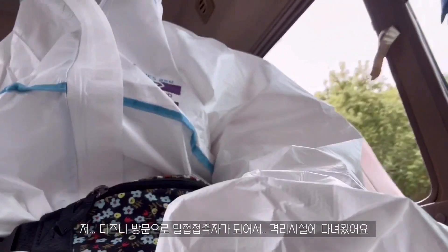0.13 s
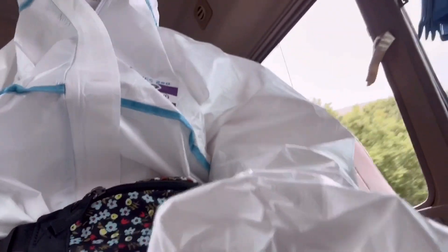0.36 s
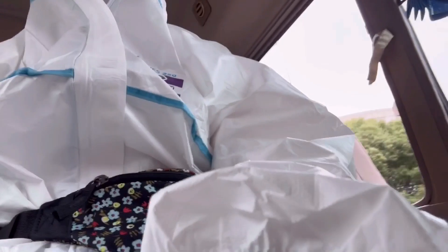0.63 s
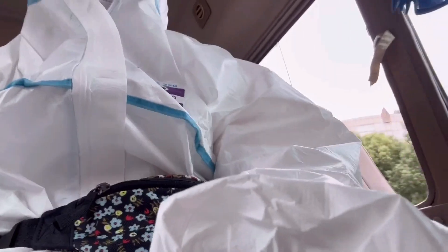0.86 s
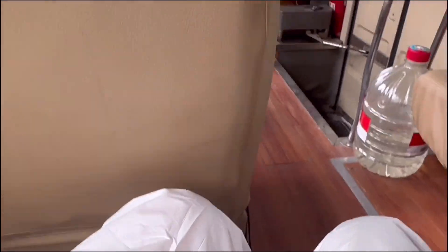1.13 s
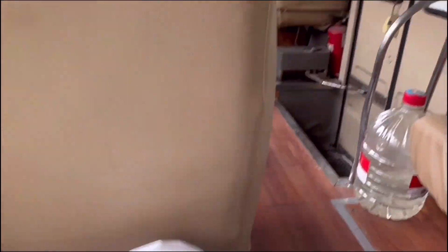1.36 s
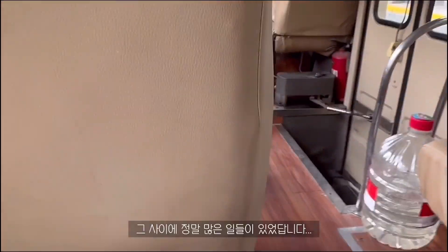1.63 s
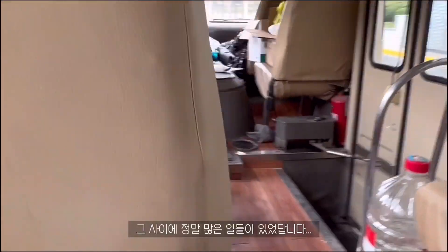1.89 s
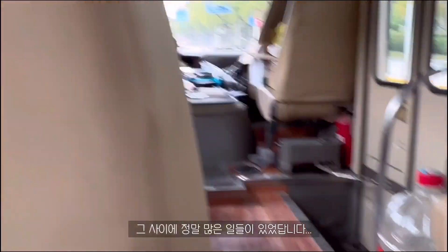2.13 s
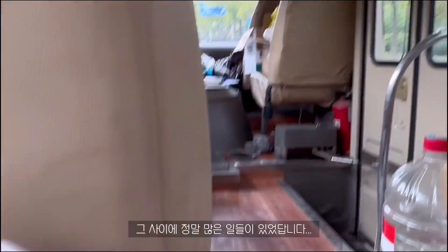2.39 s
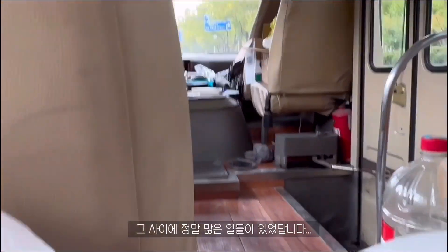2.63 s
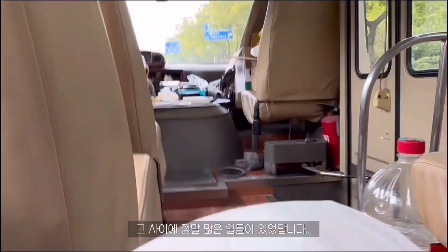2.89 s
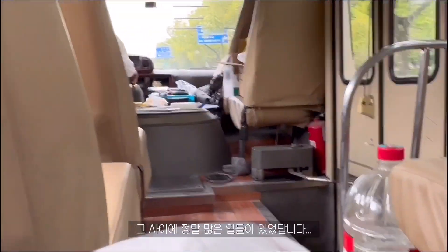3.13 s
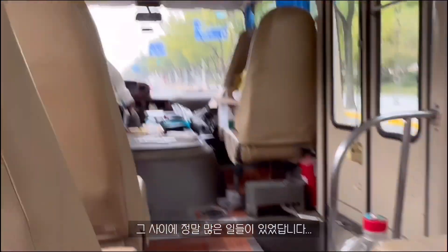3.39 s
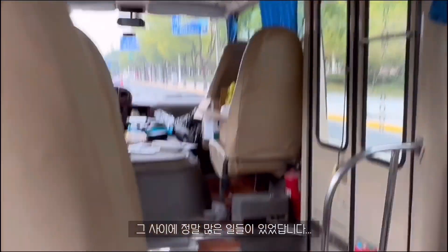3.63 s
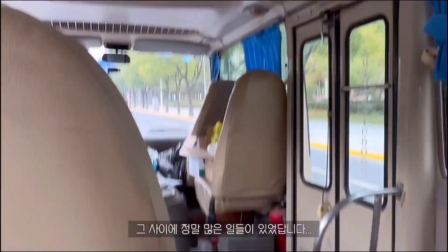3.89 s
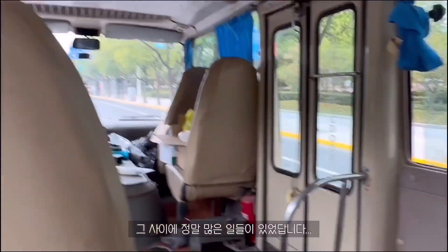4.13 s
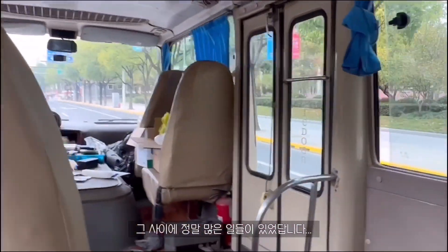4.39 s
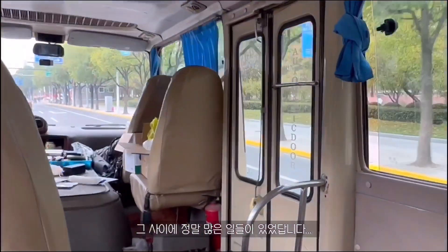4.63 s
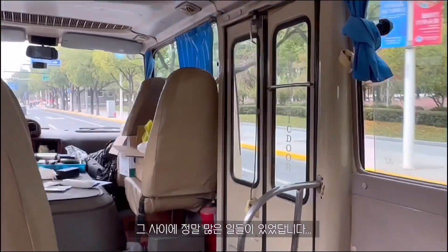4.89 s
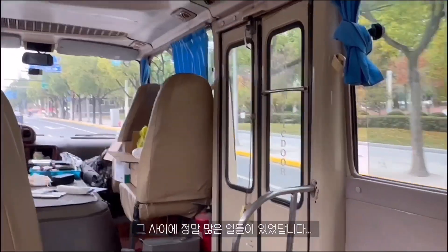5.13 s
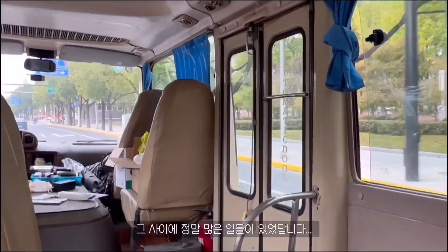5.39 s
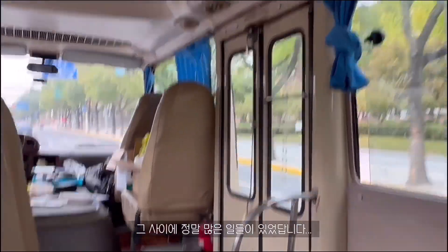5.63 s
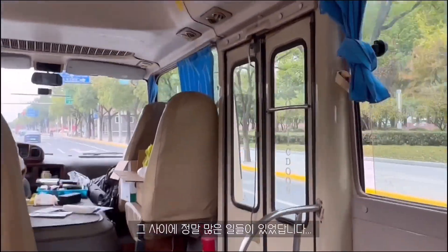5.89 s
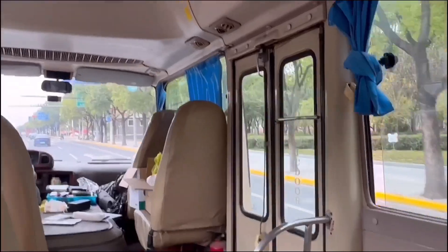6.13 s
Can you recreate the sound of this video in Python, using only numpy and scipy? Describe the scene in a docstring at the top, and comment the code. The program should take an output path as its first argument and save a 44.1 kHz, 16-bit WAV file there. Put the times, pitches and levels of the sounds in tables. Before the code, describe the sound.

Inside a moving minibus, a low engine drone and rumbling tyre roar carry on, with faint metallic ticks, small squeaks and two sharper trim rattles.

```python
"""Minibus on the road

Inside the cabin, in stereo, as a hand-held phone hears it at two microphone ports; the listening position jumps once.
The engine is an unsteady sine at its firing rate; floor rumble, tyre roar and air hiss are shaped noise.
A latch rings in metal modes, a door seal and a seat squeak in sine partials, trim rustles and creaks in noise bursts.
In gusts the phone's wind processing turns the middle tones to opposite phase; pops are short falling chirps."""
import sys
import numpy as np
from scipy import signal
from scipy.fft import rfft, irfft
from scipy.io import wavfile
from scipy.ndimage import uniform_filter1d

SR = 44100
rng = np.random.default_rng(int(sys.argv[2]) if len(sys.argv) > 2 else 0)


def makeup_ratio(level_db):
    """Linear amplitude ratio for a level in decibels (20 dB per factor of ten)."""
    decades = np.asarray(level_db, float) / 20
    return 10 ** decades


def store_pcm(level_fs):
    """Save levels as 16-bit WAV."""
    pcm = np.round(np.clip(level_fs, -1, 1) * 32767).astype(np.int16)
    wavfile.write(sys.argv[1], SR, np.atleast_2d(pcm).T)


N = 275933

CUT_S = 0.9445  # the listening position jumps here
# how far the phone has turned from facing ahead to facing the door [time_s, share 0-1]
FACING_DOOR = [(4.05, 0), (4.2, 0.75), (5.6, 1), (6.1, 0.5)]


def evened(x):
    """Scales to rms 1."""
    return x / np.sqrt(np.mean(x ** 2) + 1e-20)


def curve(rows, t, column=1):
    """Reads one column of a table at times t, in straight lines between its rows."""
    rows = np.asarray(rows)
    return np.interp(t, rows[:, 0], rows[:, column])


def over_hz(rows, hz):
    """Reads all columns of a table on a log-frequency axis."""
    row_hz, *columns = np.transpose(rows)
    return [np.interp(np.log(hz + 1), np.log(row_hz), c)[:, None] for c in columns]


def add(mix, start_s, sound):
    """Mixes a sound in at start_s."""
    part = mix[round(start_s * SR):][:len(sound)]
    part += sound[:len(part)]


def waver(count, size):
    """Smooth random drift of rms 1."""
    noise = rng.standard_normal(count)
    return evened(uniform_filter1d(uniform_filter1d(noise, size), size))


def humps(rows, t):
    """Sum of bell-shaped rises or dips in dB."""
    return sum(db * np.exp(-((t - s) / half_s) ** 2) for s, db, half_s in rows)


def resonate(x, hz, width_hz):
    """A fixed or moving resonance of gain 1, with two equal poles for steep skirts."""
    r = np.exp(-np.pi * width_hz / SR)
    turn = np.exp(2j * np.pi * np.cumsum(hz * np.ones(len(x))) / SR)
    # shift the resonance down to 0 Hz, low-pass there, shift back
    return 2 * (turn * signal.lfilter([(1 - r) ** 2], [1, -2 * r, r * r], x / turn)).real


def squeal(hz, orders, length_s, rough, flutter_db):
    """Stick-slip: partials that follow one unsteady pitch, each fluttering in level."""
    count = round(length_s * SR)
    turn = 2 * np.pi * np.cumsum(hz * (1 + rough * waver(count, size=40))) / SR
    return sum(makeup_ratio(db + flutter_db * waver(count, size=90)) * np.sin(k * turn) for k, db in orders)


def wind_processing(t):
    """Strength and octave shift of the phone's wind processing in the strongest gust at each time."""
    # gusts; the octaves move the flipped tones up, or down if negative
    # [start_s, length_s, strength 0-1, shift_octaves]
    gusts = [(1.698, .04, 0.96, 0.23), (1.714, 0.085, 0.97, -0.15), (1.783, 0.13, 0.83, -0.12),
             (1.9, 0.086, 0.94, -0.077), (1.948, 0.091, 0.76, -0.067), (2.01, 0.1, 0.91, -0.11),
             (2.11, 0.073, 0.8, -0.09), (2.177, .17, 0.61, -.1), (2.305, .16, 0.72, 0.085),
             (2.406, .06, 0.8, 0.09), (2.445, 0.11, 0.99, 0.41), (2.575, 0.073, 0.1, 0.01),
             (2.795, 0.33, 0.02, -0.11), (3.149, 0.077, 0.6, .05), (3.485, .19, 0.72, -0.16),
             (3.659, 0.065, 0.95, 0.098), (3.721, 0.099, 0.92, 0.019), (3.878, 0.096, 0.98, 0.0014),
             (3.942, 0.089, 0.91, -0.071), (4.016, 0.072, 1, 0.083)]
    rise_s, fall_s = 0.014, 0.014
    blows = []
    for start_s, length_s, strength, _ in gusts:
        ramp = np.minimum((t - start_s) / rise_s, (start_s + length_s - t) / fall_s)
        blows.append(strength * np.clip(ramp, 0, 1))
    octaves = np.array(gusts)[np.argmax(blows, axis=0), -1]
    return np.clip(np.max(blows, axis=0), 0, 1), octaves


def likeness(hz, t, lift=0):
    """How alike the ports hear each frequency (1 same, -1 opposite) by phone angle and wind processing."""
    # left-right likeness, clipped to +-1 once mixed
    # [pitch_hz, before the cut (ratio), ahead (ratio), door (ratio), full gust (ratio)]
    same = [(45, 0.6, 1.25, 1.4, 0.36), (84, 0.83, 1, 1.27, -0.79), (233, 0.75, 1.015, 0.33, -0.95),
            (397, 0.42, 0.91, 0.84, -1.03), (600, 0.7, 0.42, -0.24, -1.1), (865, -0.3, 0.68, 0.57, -1.094),
            (1060, -0.73, 0.39, -0.11, -0.86), (1530, -0.19, 0.9, 0.95, 0.077),
            (1930, 0.048, 0.84, 0.97, 0.15), (3220, -0.23, 0.41, 0.5, -0.084), (3900, .1, 0.5, 0.049, 0.34),
            (5020, -0.12, -0.62, -0.087, -0.64), (5800, -0.11, 0.93, 0.48, 1),
            (6100, -0.25, 1.05, 0.68, 1.02), (7300, 0.6, 1.05, 0.63, 1.02), (7580, -0.5, 0.7, 0.49, 0.6),
            (9000, -0.63, -0.096, -0.054, 0.039), (10000, -0.89, -0.27, -0.68, -0.36),
            (10950, 0.6, -1.08, -0.97, -0.71), (11600, 0.33, -1.94, -1.18, -1.7),
            (12300, .8, -1.2, -1.2, -1.2), (14000, 1, -1.2, -1.2, -1.3), (15000, .8, -1.0, -1.0, -1.0) ]
    flip_top_hz = 2500  # the octave shift fades out around here
    before, ahead, door, windy = over_hz(same, hz)
    turn = np.clip(curve(FACING_DOOR, t), 0, 1)
    gust, octaves = wind_processing(t)
    shifted_hz = hz[:, None] / 2 ** (octaves * np.exp(-(hz[:, None] / flip_top_hz) ** 2))
    windy = np.interp(shifted_hz, hz, windy[:, 0])
    calm = np.where(t < CUT_S, before, ahead + turn * (door - ahead))
    return np.clip(calm + gust * (windy - calm) + lift, -1, 1)


def road_db(law, t):
    """Level of one road layer from slow and short swells, the listening position and the gusts."""
    # slow rise and fall of the low rumble; other layers take a share [time_s, level_db]
    slow_swell = [(0, 8), (.27, 13), (.4, 10), (.55, 14), (.93, 9), (1.08, 2), (1.2, 13), (1.65, 4),
                  (2.17, 5.5), (2.36, 12.5), (2.56, 11.5), (2.7, 11), (3.1, 12.5), (3.55, 14), (3.78, 0),
                  (3.95, 9.5), (4.16, -1), (5.05, 0.5), (5.39, 7.5), (5.64, 10), (5.8, 1.5), (6.25, 0)]
    # short swells, or dips if negative, of drumming, roar and hiss; rumble moves oppositely;
    # before each layer takes its share [time_s, level_db, half_length_s]
    short_swells = [(.092, 9.5, 0.012), (.157, 2.5, 0.0098), (.27, 5.5, 0.031), (.428, -2, 0.0055),
                    (.483, 4.5, 0.011), (.65, 2, 0.026), (.806, 4, 0.0086), (1.31, 4.5, 0.12),
                    (2.2, 2, 0.036), (2.57, 1, 0.045), (2.93, 2.5, 0.26), (3.38, 6.5, 0.088),
                    (3.53, 5, 0.043), (4.02, 4, 0.074), (5.52, 2.5, 0.088), (5.74, 1.5, 0.094)]
    base_db, slow, short, first_db, door_db, gust_db = law
    gusty = uniform_filter1d(wind_processing(t)[0], size=4000)
    turned = np.maximum.accumulate(curve(FACING_DOOR, t))  # holds its highest share so far
    swell_db = base_db + slow * curve(slow_swell, t) + short * humps(short_swells, t)
    return swell_db + first_db * (t < CUT_S) + door_db * turned + gust_db * gusty


def road_layer(spectrum, level_db, patchy_db, flicker_db, size):
    """Random short-time spectra with drifting patches and a flicker shared by all bins."""
    # phase lead of the left port when fully facing the door [pitch_hz, lead_radians]
    door_lead = [(100, 0), (280, -0.92), (480, 0.37), (800, 1.33), (1700, 0.47), (3000, 0.32), (5800, 0)]
    ragged = 0.012  # brighter patches escape the flip in a gust by this much
    hop = size // 4
    frames, hz = N // hop + 5, np.fft.rfftfreq(size, 1 / SR)
    t = np.arange(frames) * hop / SR
    a, b, c, d, patches = rng.standard_normal((frames, len(hz), 5)).T
    patches = evened(uniform_filter1d(uniform_filter1d(patches, 10, 0), 8, 1))
    in_band = (hz > spectrum[0][0]) & (hz < spectrum[-1][0])
    shape = makeup_ratio(over_hz(spectrum, hz)[0]) * in_band[:, None]
    escape = ragged * wind_processing(t)[0] * np.maximum(patches, 0)
    same = np.minimum(likeness(hz, t) + escape, 1)
    # shared and opposite noise in the ratio that gives this likeness
    middle = np.sqrt(1 + same) * (a + 1j * b)
    side = np.sqrt(1 - same) * (c + 1j * d)
    lead = np.exp(1j * over_hz(door_lead, hz)[0] * curve(FACING_DOOR, t))
    stir = makeup_ratio(patchy_db * patches + flicker_db * waver(frames, size=3))
    z = np.array([(middle + side) * lead, middle - side]) * shape * stir
    noise = signal.istft(z, nperseg=size, noverlap=size - hop)[1][:, :N]
    return evened(noise) * makeup_ratio(level_db)


def road():
    """Floor rumble, panel drumming, tyre roar and air hiss: four bands of swelling noise."""
    # spectra of the layers, each scaled later to its level [pitch_hz, relative level_db]
    rumble = [(10, -24.5), (22, -10), (30, -9), (45, 3.5), (62, 4), (90, -1), (125, -7), (170, -28)]
    body = [(70, -13.5), (105, 2), (200, -4), (300, -6), (355, -9), (450, -11), (620, -19.5)]
    roar = [(330, 2), (500, -1.5), (900, 0), (1300, -6.5), (2000, -14.5), (3000, -34)]
    hiss = [(1700, 1), (2500, 2), (4000, -2), (5000, -2.5), (6500, -6), (9000, -9), (12000, -15.5),
            (16000, -23)]
    # level laws [base level_db, share of the slow swell (ratio), share of the short swells (ratio),
    # before_cut_db, facing_door_db, full_gust_db]; the last three add to the level
    rumble_law = (-43, 1, -0.65, -1.5, -0.5, -0.2)
    body_law = (-43, 0.3421, 0.8, -3.5, -1.2, 2.5)
    roar_law = (-48, -0.1268, 0.96, -3, 4, 2.5)
    hiss_law = (-58.5, 0.12, 0.87, -4, 4.5, 0.5)
    t = np.arange(N) / SR
    first_pan_db = -2.5  # left minus right before the cut, for all but the hiss
    lean = makeup_ratio(np.outer([0.5, -0.5], first_pan_db * (t < CUT_S)))
    low = road_layer(rumble, road_db(rumble_law, t), 0.83, 0.86, size=4096)
    low += road_layer(body, road_db(body_law, t), 1.92, 0.83, size=1024)
    low += road_layer(roar, road_db(roar_law, t), 0.52, 0.88, size=1024)
    return lean * low + road_layer(hiss, road_db(hiss_law, t), 1.76, 0.27, size=512)


def creak():
    """Faint grains of loose fittings: random hits, about 60 a second, each the same short noise burst."""
    hits = (rng.random(N) < 60 / SR) * makeup_ratio(3.9 * np.minimum(rng.exponential(1, N), 3))
    t = np.arange(1500) / SR
    grain = resonate(rng.standard_normal(len(t)), 3000, 2500) * makeup_ratio(-60 * t / 0.052)
    return makeup_ratio(-59.0) * signal.oaconvolve(hits, grain)[:N]


def trim():
    """Loose trim: bright rustles of dying noise, and one hollow knock of resonant noise."""
    # rustles and ticks [start_s, level_db, t60_s, centre_hz, width_octaves]
    rustles = [(0.081, -56, 0.051, 2500, 0.99), (.118, -41.5, 0.043, 7000, 0.2),
               (0.224, -39.5, 0.12, 3020, 0.38), (0.248, -33, 0.078, 6600, 1.1),
               (0.264, -38, 0.024, 2060, 0.89), (.664, -46, 0.025, 7500, 0.52),
               (1.209, -36.5, 0.043, 9000, 1.7), (1.262, -43, 0.087, 8000, 0.5),
               (1.334, -46, 0.12, 7900, 0.66), (2.69, -39, 0.015, 12900, 1.5),
               (2.851, -39.5, 0.37, 11000, 1.5), (3.081, -38.5, 0.036, 9000, 1.1),
               (3.255, -41.5, 0.16, 10040, 0.71), (3.328, -27.5, 0.16, 9000, 2),
               (3.497, -40, 0.11, 7300, 0.32), (3.523, -40.5, 0.16, 6800, 0.69),
               (5.445, -39.5, 0.13, 7500, 0.67), (5.488, -28, 0.15, 7070, 1.4), (5.51, -43, .15, 3500, .2),
               (5.548, -42, 0.1, 4400, 0.27), (5.545, -33.5, 0.16, 6460, 1.1)]
    # the knock [level_db, pitch_hz, length_s, width_hz]
    knock = (-45, 1150, 0.028, 180)
    knock_s, crest_db = 3.527, 8.5  # crest: room left for a rustle's peak above its rms
    out, t, hz = np.zeros(N), np.arange(8192) / SR, np.fft.rfftfreq(8192, 1 / SR)
    for start_s, db, t60_s, centre_hz, octaves in rustles:
        colour = np.exp(-(np.log2(hz / centre_hz + 1e-3) / octaves) ** 2)
        puff = evened(irfft(rfft(rng.standard_normal(len(t))) * colour))
        rise = np.minimum(t / (0.5 * t60_s ** 2 + 1e-4), 1)  # long rustles start more softly
        fall_db = -60 * t / max(t60_s, 0.003)
        level = makeup_ratio(db - crest_db + fall_db + 3.2 * waver(len(t), size=100))
        add(out, start_s, level * rise * puff)
    db, knock_hz, length_s, width_hz = knock
    shape = np.exp(-(t / length_s) ** 4) * np.minimum(t / 0.0026, 1)
    thud = evened(resonate(rng.standard_normal(len(t)), knock_hz, width_hz))
    add(out, knock_s, makeup_ratio(db) * shape * thud)
    return out


def seat():
    """Softer stick-slip squeaks of a seat frame that swell and fade."""
    # squeaks; pitch is that of the overtone at four times the base
    # [start_s, level_db, pitch_hz, length_s, low overtones level_db]
    squeaks = [(0.066, -69, 8900, 0.041, 0), (0.107, -54, 9000, 0.05, -5), (0.514, -58, 9140, 0.052, -5.5),
               (0.573, -62.5, 9150, 0.025, 5), (0.7, -59, 8960, 0.045, -0.5),
               (1.345, -59, 9000, 0.097, -16), (1.498, -57, 8750, 0.042, -10),
               (1.66, -60, 8930, 0.027, -12), (2.034, -46.5, 9080, 0.029, -17),
               (2.457, -54.5, 8790, 0.034, -13), (2.498, -56, 8900, 0.049, -22),
               (2.818, -47, 9000, 0.044, -19), (2.887, -45.5, 8960, 0.028, -16),
               (3.471, -37, 8700, 0.041, -39), (3.74, -56.5, 9000, 0.053, -16),
               (3.851, -49.5, 8950, 0.038, -12.5), (3.9765, -41, 8970, 0.038, -16),
               (4.025, -62, 9000, 0.069, -1), (5.49, -50, 9200, 0.026, -7), (5.548, -58, 9000, 0.027, -10),
               (5.773, -58, 8640, 0.039, -3)]
    # overtones [multiple (ratio), level_db, share of the low overtone level (ratio)]
    overtones = [(1, 3.5, 0.93), (2, 3.5, 0.93), (3, -8, 0.54), (4, -5.5, 0.11), (6, -19, 0.24)]
    fade = 2  # steepness of the end
    arch, wander = 0.008, 0.011  # shares by which the pitch arches and drifts
    out, t = np.zeros(N), np.arange(6615) / SR
    for start_s, db, hz, length_s, low_db in squeaks:
        orders = [(k, order_db + share * low_db) for k, order_db, share in overtones]
        bow = np.sin(np.pi * np.minimum(t / (fade * length_s), 1)) - 0.5
        bend = 1 + arch * bow + wander * waver(len(t), size=600)
        sound = squeal(bend * hz / 4, orders, len(t) / SR, rough=0.011, flutter_db=5.0)
        shape = np.minimum(t / 0.0058, 1) * np.exp(-(t / length_s) ** fade)
        add(out, start_s, makeup_ratio(db) * sound * shape)
    return out


def seal():
    """Sharp stick-slip squeaks of the door seal: a gritty, falling tone that judders as it dies away."""
    # squeaks [start_s, level_db, pitch_hz, t60_s, rise_s]
    squeaks = [(3.323, -33.5, 5784, 0.12, 0.0036), (5.54, -36, 5750, 0.11, 0.0076)]
    # partials, some off the harmonic series [multiple (ratio), level_db]
    partials = [(1, -2.5), (1.099, -8), (1.35, -27), (1.67, -23), (1.951, -4.5), (2.03, -4), (2.6, -20.5)]
    hold_s, sag_per_s = 0.0085, 0.49  # time before it dies away; share of pitch lost per second
    out, t = np.zeros(N), np.arange(9000) / SR
    for start_s, db, hz, t60_s, rise_s in squeaks:
        judder = 1 - 0.16 * np.cos(2 * np.pi * 92 * t)
        fall_db = -60 * np.maximum(t - rise_s - hold_s, 0) / max(t60_s, 0.01)
        shape = np.minimum(t / rise_s, 1) * judder * makeup_ratio(db + fall_db)
        tone = squeal(hz * (1 - sag_per_s * t), partials, len(t) / SR, rough=0.0035, flutter_db=5.5)
        grit = evened(resonate(rng.standard_normal(len(t)), hz, 350))
        add(out, start_s, shape * (tone + makeup_ratio(2) * grit))
    return out


def latch():
    """Door latch ticks: each chirps upward into the same two groups of metal modes."""
    # ticks [start_s, ring level_db, upper modes level_db]
    ticks = [(0.0328, -59.5, -5), (.081, -64, -1), (0.128, -58.5, 0), (.172, -76, -5), (0.2095, -60, -5),
             (.247, -68, -3), (0.261, -59.5, -7), (0.351, -64, -5), (0.4363, -66, -7), (0.485, -66, -4),
             (0.577, -60, -5), (0.664, -60, -5), (0.712, -60.5, -3.5), (.759, -57.5, -1.5),
             (0.804, -64, -3), (.844, -63, -6), (0.8904, -63, -1), (0.934, -71, -2), (1.0302, -65, -15),
             (1.206, -58, -4), (1.288, -52.5, -17), (1.4326, -61.5, -13), (1.5118, -64, -10),
             (2.5095, -58.5, -9), (3.262, -58.5, -10), (3.508, -61, -19), (3.577, -71, -16),
             (3.827, -64, -10), (3.874, -64.5, 1), (4.0713, -63.5, -12), (5.457, -63, -14),
             (5.501, -60, -17), (5.653, -56.5, -11), (6.213, -65, -2)]
    # modes [pitch_hz, width_hz, level_db, share of the upper modes level (ratio)]
    modes = [(6245, 350, 3, 0.16), (6560, 270, -5.5, 0.12), (12210, 900, 1, 0.99), (13600, 420, -17, 0.9)]
    chirp, chirp_s = 0.034, 0.006  # starts flat by this share and slides up
    first_t60_s, later_t60_s = 0.21, 0.077  # ring time before and after the cut
    out, t = np.zeros(N), np.arange(9000) / SR
    slide = 1 - chirp * np.exp(-t / chirp_s)
    for start_s, db, upper_db in ticks:
        t60_s = first_t60_s if start_s < CUT_S else later_t60_s
        rattle = rng.standard_normal(len(t))
        ring = np.zeros(len(t))
        for hz, width_hz, mode_db, upper in modes:
            ring += makeup_ratio(mode_db + upper * upper_db) * evened(resonate(rattle, hz * slide, width_hz))
        shape = makeup_ratio(-60 * t / t60_s) + 2.16 * np.exp(-t / 0.0047)  # long ring plus a sharp onset
        add(out, start_s, makeup_ratio(db) * np.minimum(t / 0.0005, 1) * shape * ring)
    return out


def cabin(x):
    """Adds a short ring of the cabin, then sets the phase between the ports by their likeness."""
    # fittings are set more alike in the two ports than the road, most around 11.4 kHz
    near_lift, treble_lift, treble_hz, treble_width_hz = 0.18, 0.61, 11380, 340
    t = np.arange(6000) / SR
    tails = rng.standard_normal((2, len(t))) * makeup_ratio(-60 * t / 0.22) * (t > 0.003)
    wet = signal.fftconvolve(x[None], tails / np.linalg.norm(tails[0]), axes=1)[:, :N]
    hz, frames, z = signal.stft(x + makeup_ratio(-1.5) * wet.mean(0), SR, nperseg=512)
    lift = near_lift + treble_lift * np.exp(-((hz[:, None] - treble_hz) / treble_width_hz) ** 2)
    lean = np.exp(0.5j * np.arccos(likeness(hz, frames, lift)))
    ports = signal.istft(np.array([z * lean, z / lean]), SR, nperseg=512)[1][:, :N]
    return ports + makeup_ratio(-26) * (wet - wet.mean(0))


def pops():
    """Short falling chirps, opposite in the two ports; the cut adds one click, alike in both."""
    # pops [start_s, level_db]
    bursts = [(1.718, -35), (1.774, -35), (2.156, -46), (2.246, -44), (2.48, -25), (2.521, -26),
              (2.585, -32), (2.611, -32.5), (3.669, -31), (3.686, -30.5), (3.716, -43), (3.742, -30),
              (3.765, -25), (3.788, -25), (3.818, -28), (3.902, -29), (3.911, -25), (3.957, -27),
              (4.052, -25)]
    out, step, t = np.zeros(N), np.zeros(N), np.arange(1300) / SR
    for start_s, db in bursts:
        hz = 200 + rng.uniform(0.8, 1.2) * 1900 * np.exp(-t / 0.0017)
        shape = np.minimum(t / 0.00065, 1) ** 2 * makeup_ratio(db - 60 * t / 0.041)
        add(out, start_s, shape * np.sin(2 * np.pi * np.cumsum(hz) / SR))
    add(step, CUT_S, 0.052 * np.exp(-t / 0.00068))
    return np.array([step + out, step - out])


def engine():
    """The firing rate booms in the cabin as a slightly unsteady sine, with faint fuzzy whines."""
    # boom after the cut, before its waver [time_s, firing_hz, level_db]
    firing = [(0.95, 85.4, -40), (0.99, 85.7, -27.5), (1.32, 85.8, -30.5), (1.41, 85.05, -26.5),
              (2.06, 83.4, -27.5), (2.51, 83.54, -28), (2.54, 83.2, -39.5), (2.65, 82.15, -25.5),
              (3.03, 80.4, -29.5), (3.06, 79.43, -39), (3.09, 80.4, -22.5), (3.13, 79.7, -33.5),
              (3.4, 80.1, -26.5), (3.43, 80.23, -56), (3.44, 80.1, -34), (3.52, 80.0, -27.5),
              (3.81, 80.4, -33), (3.89, 80.0, -29.5), (3.92, 79.9, -42), (4.0, 80.4, -25.5),
              (4.2, 80.4, -48.5), (4.34, 80.8, -39), (4.92, 80.3, -32), (5.36, 81.6, -34),
              (5.52, 81.06, -39.5), (5.55, 81, -29), (5.81, 81.5, -37), (5.94, 81.4, -29.5),
              (6.16, 81.5, -35.5), (6.25, 80.3, -33.5)]
    # brief dips where boom and rumble beat together [time_s, level_db, half_length_s]
    beat_dips = [(3.055, -3, 0.02), (5.44, -4, 0.015), (5.62, -4, .02)]
    # balance of the boom [time_s, left_minus_right_db]
    balance = [(.95, 0), (1.55, 0), (1.72, 0.5), (1.9, 4), (2.4, -1), (2.6, 1), (3.7, -1.5), (4.05, -1),
               (4.25, -19), (4.5, -4), (4.8, 2.5), (5.9, 0.5), (6.25, -5.5)]
    # fuzzy hump that stands for the boom before the cut [pitch_hz, width_hz, level_db]
    first_boom = (84, 23, -43.5)
    # whines; the opposite-phase part is relative to the shared part
    # [pitch_hz, start_s, end_s, width_hz, level_db, opposite-phase level_db]
    whines = [(355, 0, .93, 25, -58, 6), (600, 0, .93, 25, -71, 8), (350, 1.72, 2.5, 30, -58, 9),
              (346, 2.12, 2.36, 30, -47, -6), (353.4, 2.5, 3.3, 23, -45.5, -14),
              (760.6, 4.9, 7.1, 12.2, -61, -6), (1204.5, 4.5, 6.25, 74, -59.5, -6),
              (1732, 4.08, 4.52, 45.6, -61, -6)]
    order_two_db, order_two_door_db = -31, 10.5  # second order, and its rise when facing the door
    t = np.arange(N) / SR
    turn = 2 * np.pi * np.cumsum(curve(firing, t) + 0.57 * waver(N, size=1500)) / SR
    # the wind processing shifts the phase between the ports
    slip = wind_processing(t)[0] * (0.15 + 0.24 * waver(N, size=1500))
    turn = np.array([turn + slip, turn - slip])
    turned = np.maximum.accumulate(curve(FACING_DOOR, t))
    boom = np.sin(turn) + makeup_ratio(order_two_db + order_two_door_db * turned) * np.sin(2 * turn)
    boom_db = curve(firing, t, column=2) + humps(beat_dips, t) + 0.99 * waver(N, size=900)
    boom *= np.sqrt(2) * makeup_ratio(boom_db) * (t > CUT_S)
    pan_db = curve(balance, t) / 2
    out = boom * makeup_ratio([pan_db, -pan_db])
    hz, width_hz, db = first_boom
    out += makeup_ratio(db) * evened(resonate(rng.standard_normal(N), hz, width_hz)) * (t < CUT_S)
    for hz, start_s, end_s, width_hz, db, side_db in whines:
        span = (t > start_s) & (t < end_s)
        fade = np.clip(np.minimum(t - start_s, end_s - t)[span] / 0.062, 0, 1)
        both, side = (evened(resonate(x[span], hz, width_hz)) for x in rng.standard_normal((2, N)))
        out[:, span] += fade * makeup_ratio(db) * (both + makeup_ratio(side_db) * np.array([side, -side]))
    return out


def scene():
    """Everything in the cabin."""
    fittings = creak() + trim() + seat() + seal() + latch()
    return road() + cabin(fittings) + pops() + engine()


def roll_off(x):
    """The treble ends steeply here."""
    return signal.sosfilt(signal.butter(12, 15950, fs=SR, output="sos"), x)


def record(dry):
    """The finished mix as the phone stores it."""
    return roll_off(dry)


dry = scene()
out = record(dry)
store_pcm(out)
```